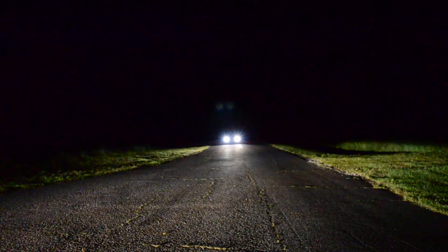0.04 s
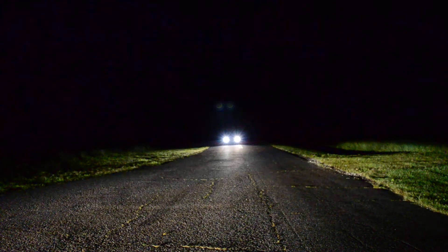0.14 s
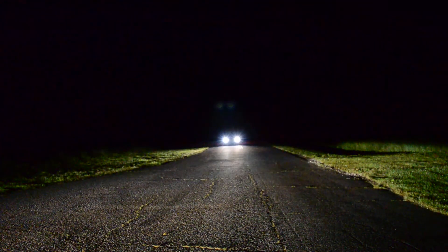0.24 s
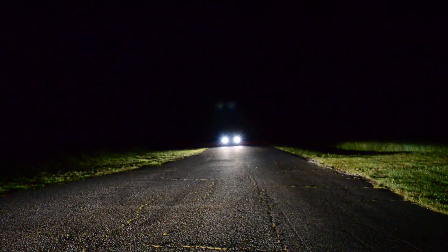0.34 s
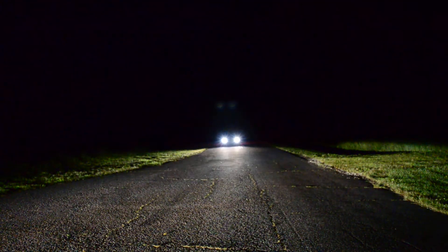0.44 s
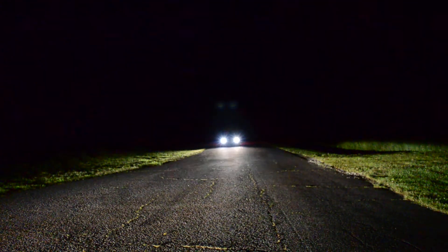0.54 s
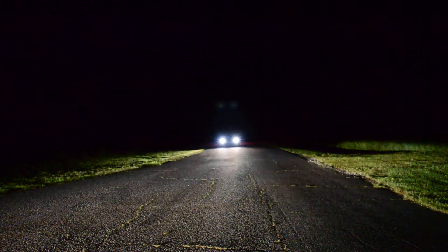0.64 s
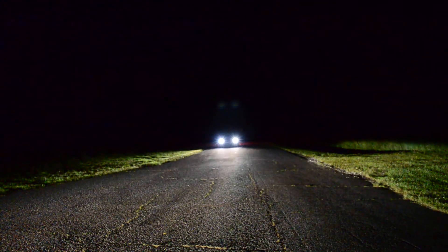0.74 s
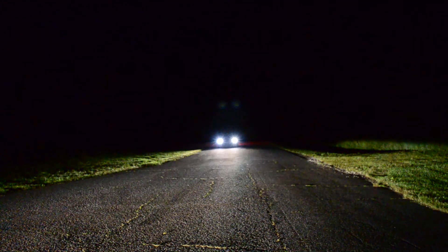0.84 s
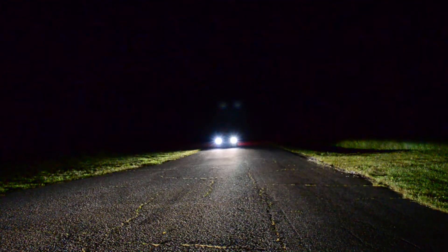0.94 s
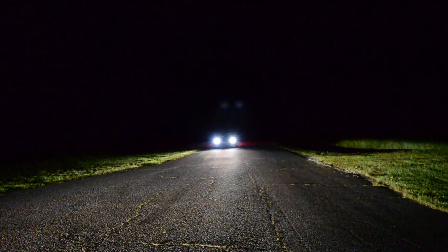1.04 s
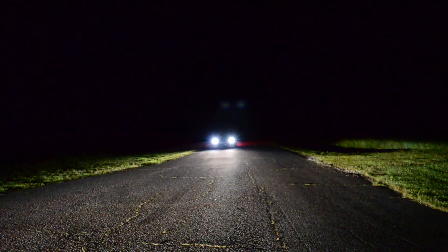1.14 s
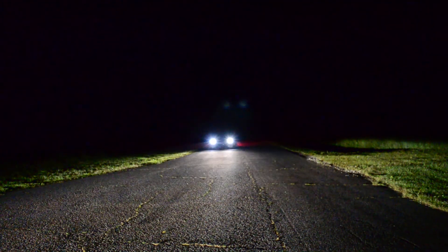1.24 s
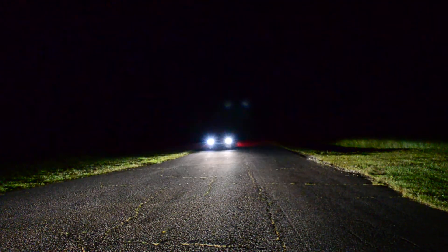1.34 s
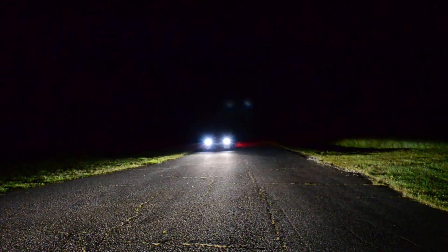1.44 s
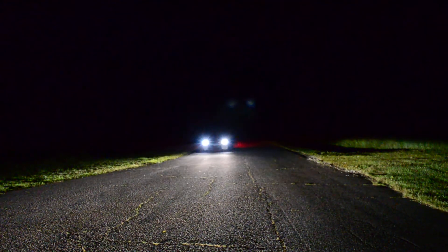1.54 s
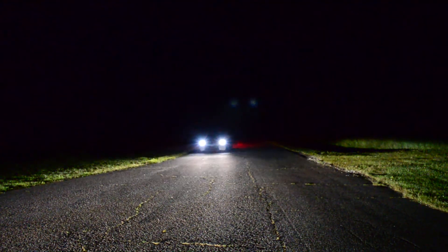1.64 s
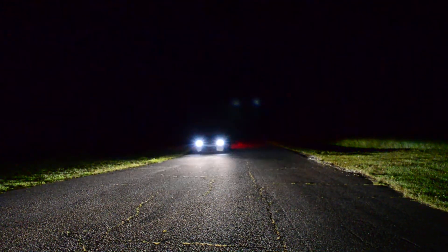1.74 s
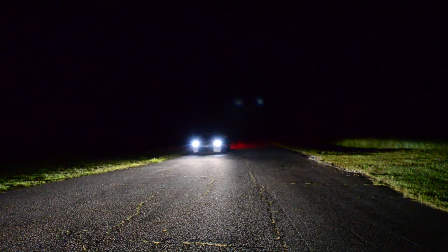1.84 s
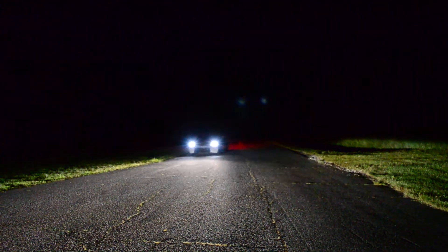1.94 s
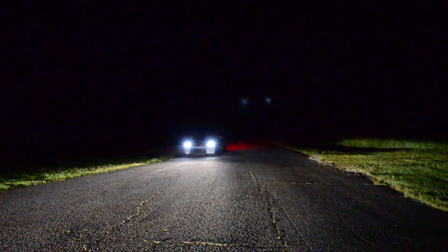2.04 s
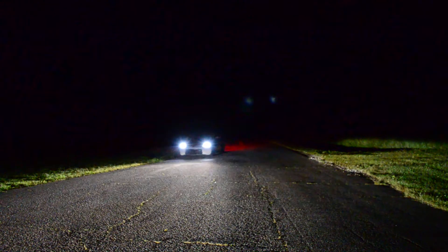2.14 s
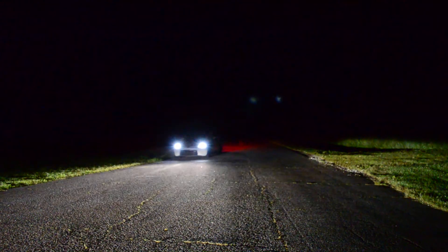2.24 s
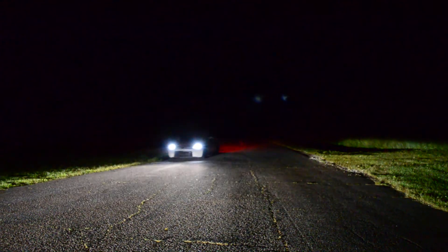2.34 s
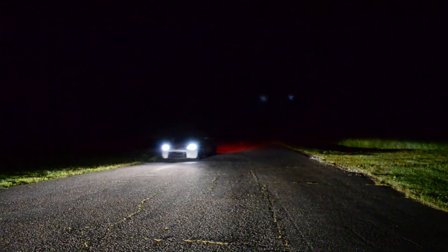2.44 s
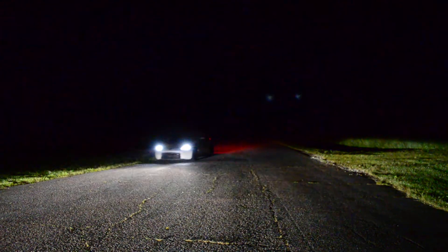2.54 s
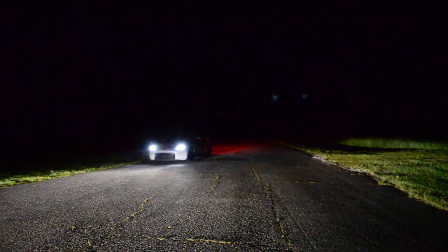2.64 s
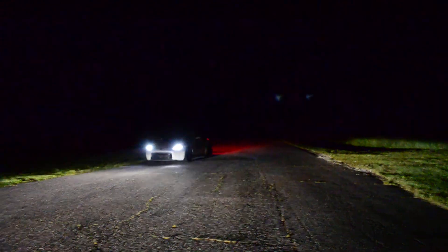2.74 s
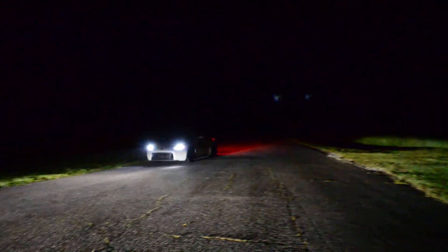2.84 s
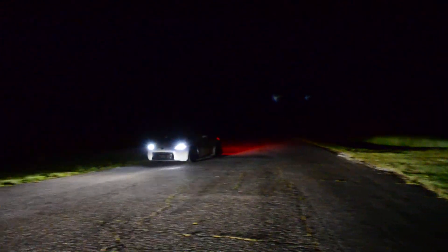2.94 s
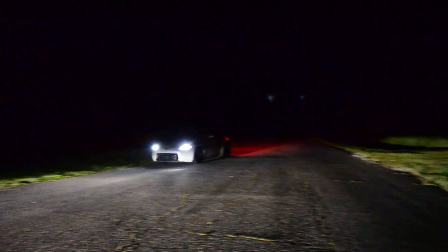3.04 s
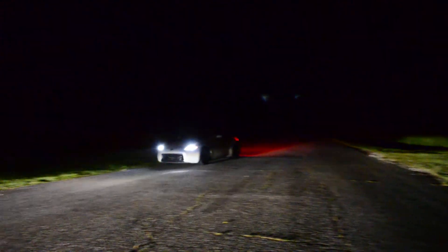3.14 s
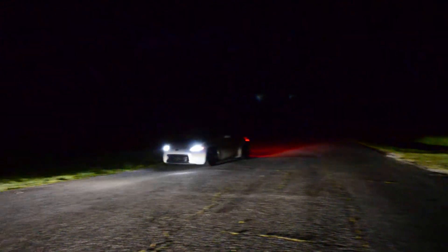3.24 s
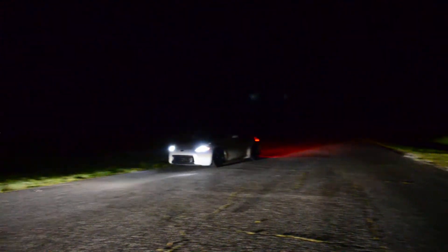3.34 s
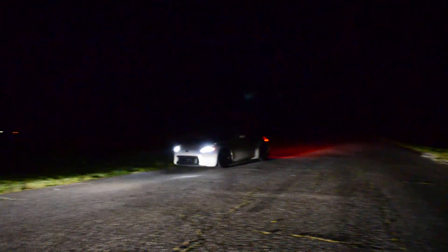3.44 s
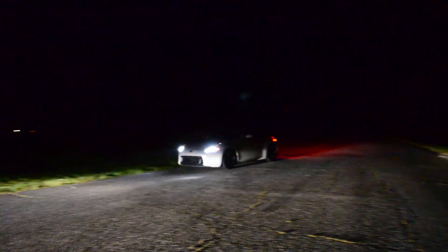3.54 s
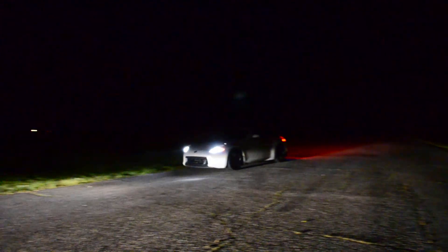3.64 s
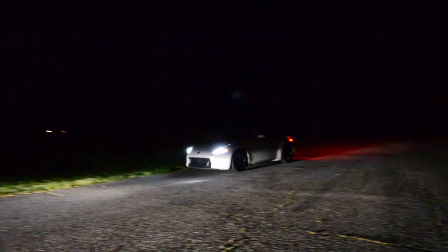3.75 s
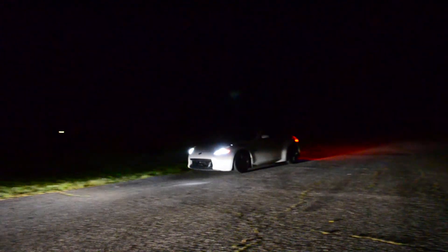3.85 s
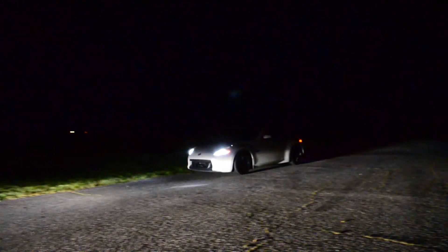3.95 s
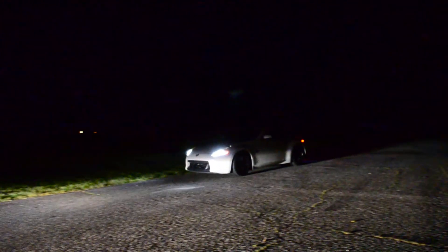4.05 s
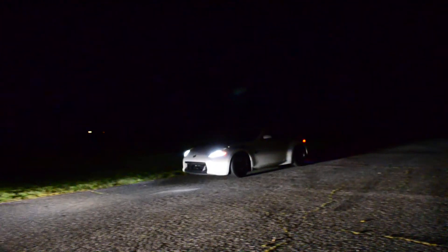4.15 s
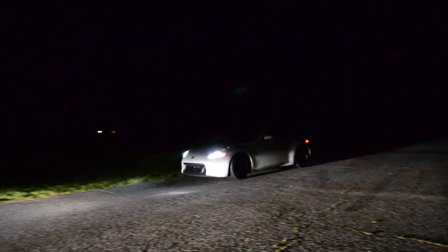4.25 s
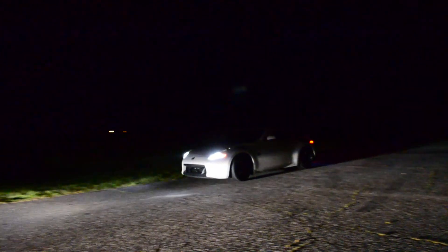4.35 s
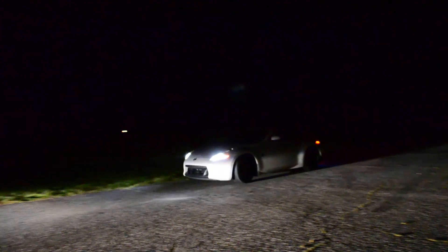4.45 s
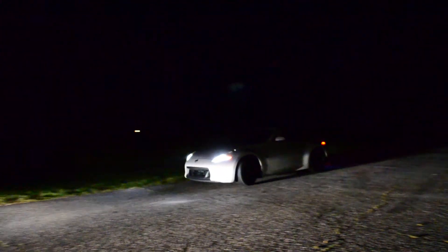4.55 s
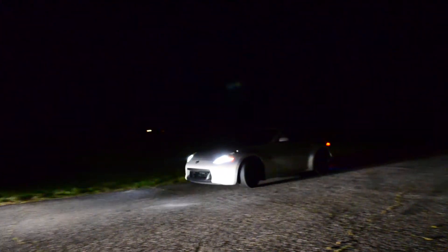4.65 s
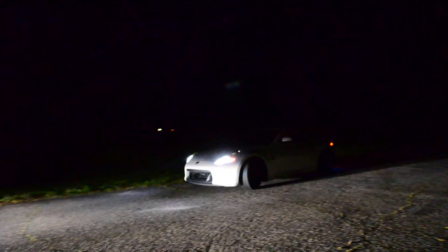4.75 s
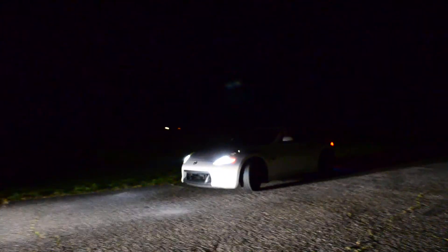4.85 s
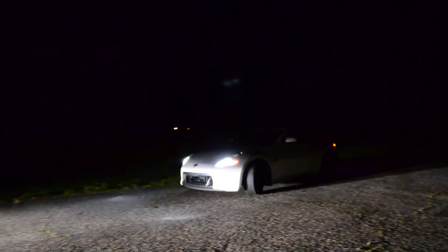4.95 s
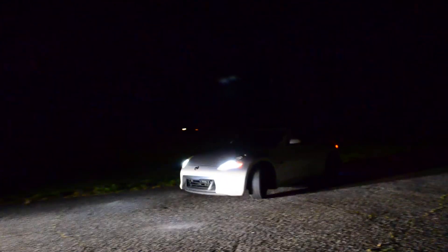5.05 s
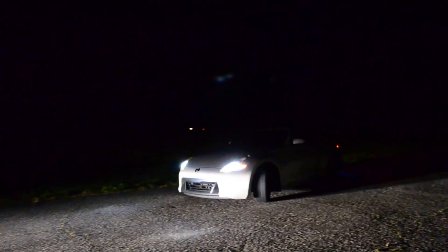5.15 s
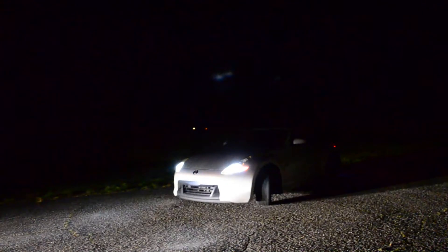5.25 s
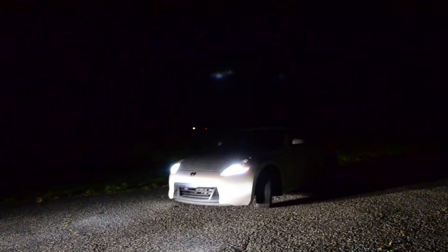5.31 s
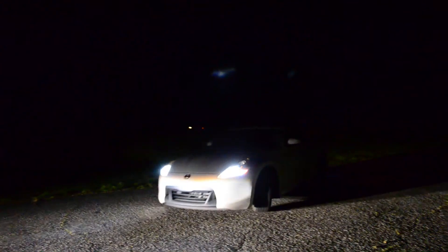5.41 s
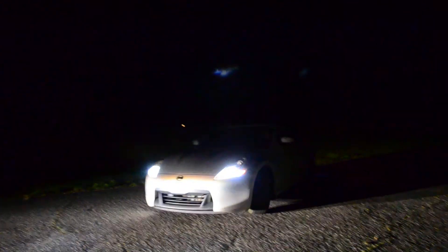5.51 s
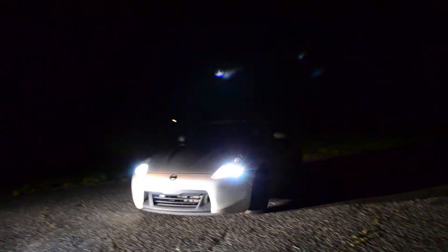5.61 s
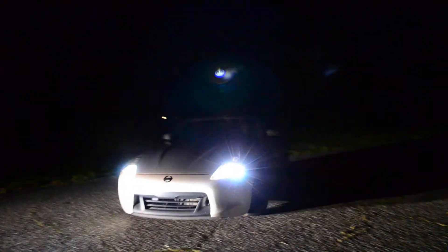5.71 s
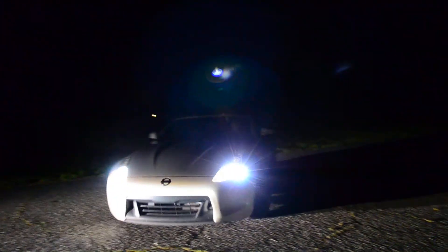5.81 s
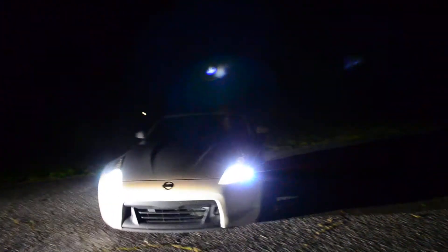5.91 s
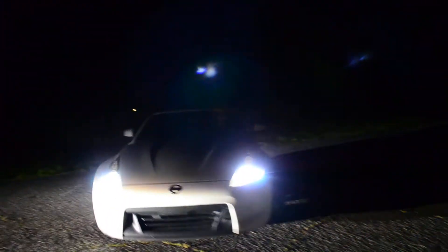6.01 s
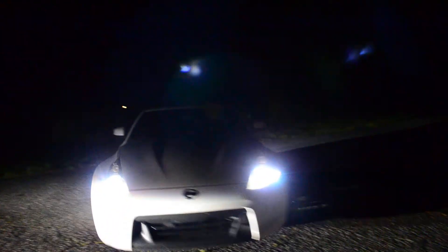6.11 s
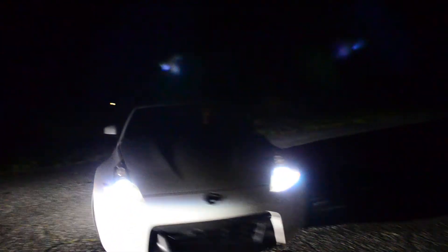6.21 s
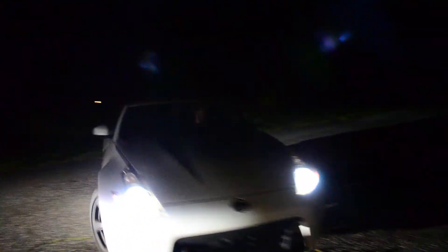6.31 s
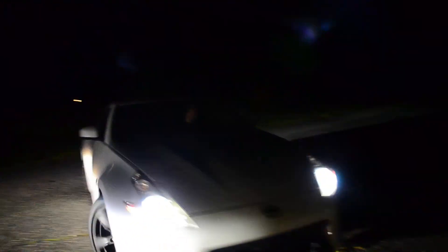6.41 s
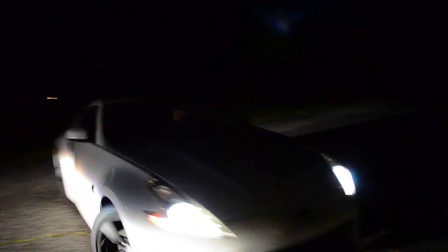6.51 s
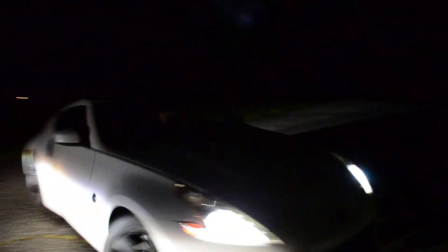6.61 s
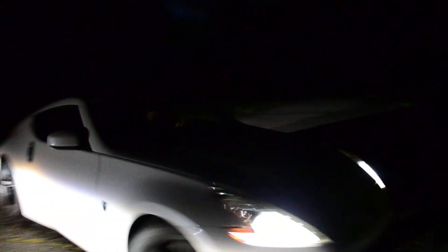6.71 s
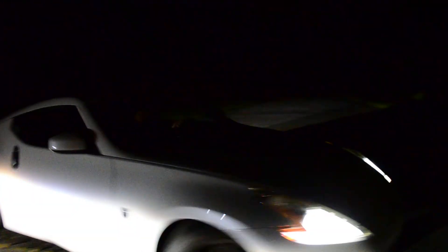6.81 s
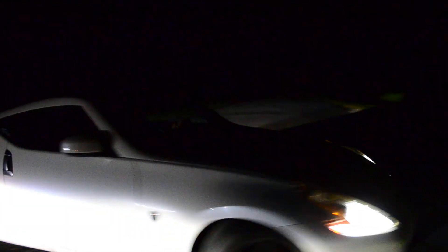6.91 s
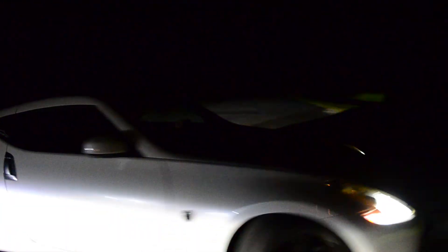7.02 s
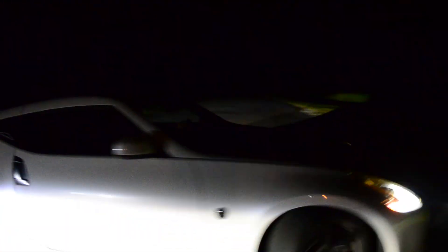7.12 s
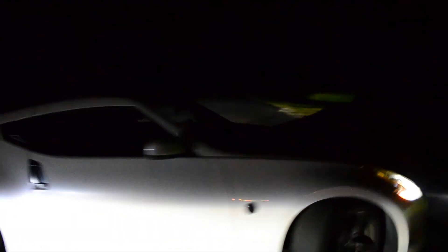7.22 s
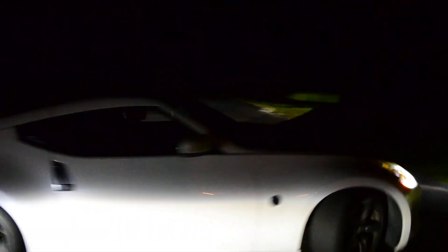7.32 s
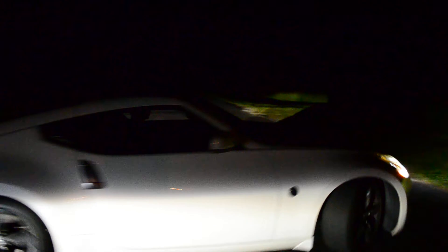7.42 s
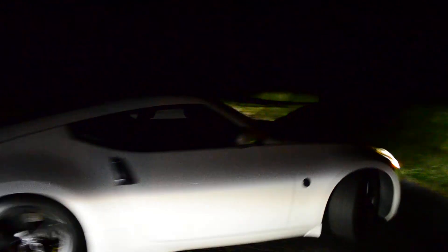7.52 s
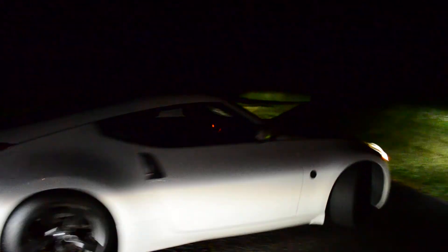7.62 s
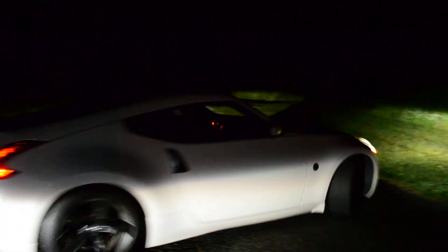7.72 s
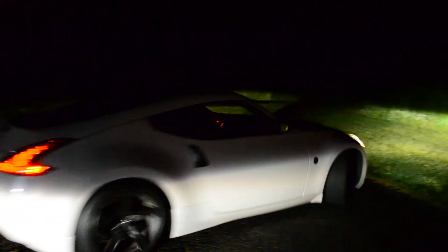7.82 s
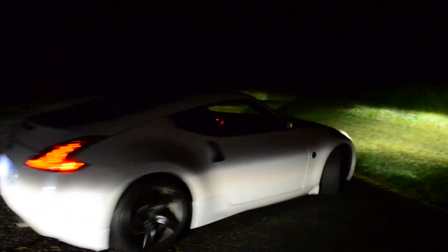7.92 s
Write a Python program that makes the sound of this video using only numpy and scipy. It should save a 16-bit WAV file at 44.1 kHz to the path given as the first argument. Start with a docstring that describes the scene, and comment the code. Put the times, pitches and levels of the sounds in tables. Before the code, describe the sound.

A sports car creeps closer past crickets and frogs, blipping its throttle, then passes close with a booming exhaust and grit snapping under its tyres.

```python
"""Night, country road. Crickets and tree frogs trill; a V6 sports car creeps up, blipping its throttle.
Its pipes boom on the firing rate and its octave, uneven firings burble, pulse fronts growl,
the engine bay clatters. By 4 s the car is nearer and the wildlife has stopped.
The car turns, with knocks from underneath, and from about 6 s passes close:
the pipes rasp, the tyres hiss, grit snaps under the tread."""
import sys
import numpy as np
from scipy import signal
from scipy.fft import rfft, irfft, next_fast_len
from scipy.io import wavfile
from scipy.ndimage import uniform_filter1d, minimum_filter1d

SR = 44100
rng = np.random.default_rng(int(sys.argv[2]) if len(sys.argv) > 2 else 0)


def put_to_file(sound):
    """Save the sound as 16-bit audio at rate SR, in the file named by the first command-line argument."""
    columns = np.atleast_2d(sound).T  # one column per channel
    safe = np.clip(columns, -1, 1)
    whole_steps = np.round(safe * 32767)
    wavfile.write(sys.argv[1], SR, whole_steps.astype(np.int16))


N = 351477
T = np.arange(N) / SR

# night air spectrum [f/Hz, level/dB]
AIR_SPECTRUM = [(15, -13.5), (30, -7), (60, 8.5), (150, 3), (500, -9.5), (2000, -25), (6000, -51.5),
                (15000, -51.5)]
# first cricket's trill [t/s, level/dB]
CRICKET_LEVEL = [(0, -65.5), (1.5, -66.5), (2.65, -68.5), (3.0, -89)]
# second cricket's chirps [t/s, level/dB]
CRICKET_CHIRPS = [(.45, -68), (1.01, -66), (1.6, -58), (2.15, -61)]
# tree frog trills [start/s, end/s, f/Hz, pulse rate/Hz, level/dB]
FROG_TRILLS = [(0, .31, 2470, 31, -56.5), (2.556, 3.3, 2261, 36, -51), (3.36, 3.737, 2540, 32, -56.5)]

# tread hiss spectrum [f/Hz, level/dB]
HISS_SPECTRUM = [(3000, -5), (5000, 2.5), (7000, -1.5), (8500, -6), (10000, -5.5), (12500, -6.5),
                 (14000, -13.5), (16000, -27)]
# loudest stone snaps [t/s, peak/dB, f/Hz]
STONE_SNAPS = [(1.372, -29, 3000), (4.401, -33, 3300), (5.913, -23, 3000), (6.405, -34, 8000),
               (6.455, -21, 3000), (6.505, -31, 5000), (6.55, -28, 4200), (6.642, -26, 3500),
               (6.737, -28, 4000), (6.764, -34, 10000), (6.884, -23, 3200), (7.151, -19, 2400),
               (7.154, -29, 8000), (7.289, -26, 2800), (7.333, -36, 9000), (7.491, -30, 5000),
               (7.857, -36, 7000)]
# underbody knocks [t/s, peak/dB]
KNOCK_HITS = [(.888, -24), (4.697, -20), (5.185, -18.5), (5.216, -23), (5.236, -18.5), (5.61, -21),
              (5.816, -19), (6.641, -16), (6.685, -13), (6.737, -13), (6.751, -12), (6.772, -15),
              (6.798, -12), (7.742, -17)]
# underbody and panel resonances [f/Hz, width/Hz, gain/dB]
UNDERBODY_MODES = [(720, 200, -8), (1150, 300, 1), (1650, 500, -8), (3000, 1200, -25)]
PANEL_MODES = [(670, 4.9, -6), (929, 18, -6.5), (1294, 150, -19.5), (1863, 140, -8.5), (2900, 150, -12)]

# engine bay clatter spectrum by side heard [f/Hz, gain/dB]
CLATTER_HEAD_ON = [(60, -24), (200, -11), (370, -11.5), (470, -4.5), (690, -1), (880, -10), (1000, -0.5),
                   (1200, 0.5), (1390, -11.5), (1680, -8.5), (2050, -22.5), (2800, -37.5), (5000, -65.5)]
CLATTER_TURNING = [(60, -23), (200, 2.5), (380, -21.5), (520, -4), (670, 0.5), (810, -8), (1000, -4.5),
                   (1250, -1), (1480, -8.5), (1850, -9), (2150, -23.5), (2800, -29), (5000, -57.5)]
CLATTER_ALONGSIDE = [(60, -42), (200, 3), (450, -3.5), (600, 5.5), (760, 5), (930, 3.5), (1080, -2),
                     (1370, 5), (1650, -3), (2050, -13.5), (2700, -56.5), (5000, -50)]
# belt and intake rush spectrum [f/Hz, gain/dB]
RUSH_SPECTRUM = [(1400, -9), (2200, 5), (2650, -0.5), (3050, -0.5), (3700, -6), (4400, -11), (5200, -19),
                 (7000, -41), (12000, -49.5)]
# engine bay envelopes [t/s, level/dB]
CLATTER_LEVEL = [(0, -32.5), (.9, -31.5), (2, -36), (3.2, -35.5), (3.85, -39.5), (4.6, -38), (5.5, -33),
                 (6.15, -32), (6.55, -27.5), (6.78, -24), (7, -27), (7.97, -31.5)]
BELT_INTAKE_LEVEL = [(0, -55.5), (2.6, -53.5), (3.38, -49.5), (3.85, -54), (4.6, -51), (5.55, -52),
                     (5.9, -49.5), (6.25, -49), (6.45, -41), (7.25, -41), (7.97, -45.5)]

# engine firing rate [t/s, f/Hz]
FIRING_RATE = [(0, 66.93), (1.45, 65.8), (1.62, 55.8), (1.88, 104), (2.02, 112), (2.15, 102.8),
               (2.78, 88.22), (3, 76.24), (3.25, 71.32), (3.72, 84.1), (4.1, 76), (4.4, 75.5), (5, 66.04),
               (5.33, 53.46), (5.55, 52.93), (5.75, 60.08), (5.95, 60.57), (6.3, 68.1), (6.65, 59.58),
               (6.9, 47.92), (7.2, 58.17), (7.6, 75.04), (7.97, 78.32)]
# six cylinders in firing order [level/dB]
CYLINDER_DB = [5, -1, 1.3, 0.2, 3, -1]
# pipe resonances: low, heard from ahead, heard towards the tailpipes [f/Hz, width/Hz, gain/dB]
PIPE_BURBLE_MODES = [(97.2, 43.6, 8), (121.1, 24.4, 6), (160.1, 20.6, 0.5), (183.3, 19.4, -4.5)]
PIPE_GROWL_MODES = [(267.4, 66.7, 3.3)]
PIPE_RASP_MODES = [(298.7, 59, 0), (352, 42, 0)]
# exhaust envelopes [t/s, level/dB]
BURBLE_LEVEL = [(0, -38), (1.5, -33.5), (2.4, -29.5), (4.3, -29), (4.9, -27.5), (5.25, -28.5), (5.8, -36),
                (6.25, -23), (6.85, -25.5), (7.1, -26), (7.5, -20), (7.97, -21)]
GROWL_LEVEL = [(0, -38.5), (1.4, -37.5), (2.2, -41.5), (2.9, -34.5), (3.2, -43), (4.3, -43), (5, -50),
               (5.3, -42), (5.8, -38), (6.3, -30), (6.8, -41), (7.55, -22), (7.97, -33.5)]
# gas flow harmonics; 1.5 comes from the two unequal banks [f/firing rate]
FLOW_MULTIPLES = [1, 1.5, 2, 3]
# strength of each harmonic [level/dB]
FLOW_DB = [-0.5, -19, 1.5, -8]
# pipe response, booming at about 70-135 Hz [f/Hz, gain/dB]
PIPE_RESPONSE = [(50, -20.5), (60, -27.5), (67, -8.5), (72, -2), (78, -0.5), (102, 3), (114, 2),
                 (123, -1.5), (135, -1.5), (150, -13.5), (195, -16.5), (230, -22)]
# throttle blips (+) and lifts (-) [centre t/s, half-length/s, boom gain/dB]
THROTTLE_MOVES = [(1.644, 0.059, 10.5), (1.73, .03, -4), (1.927, 0.19, 7), (2.765, 0.43, 9.5),
                  (3.208, 0.091, -13), (3.65, 0.15, 7), (4.816, 0.063, 3), (5.02, .06, -4),
                  (5.16, 0.063, 8.5), (5.28, .04, 3), (5.438, 0.047, -5), (5.996, .15, 11),
                  (6.871, 0.14, -5.5), (7.31, .17, 11)]
# approach and turn [t/s, boom base level/dB, bass tilt/(dB/octave), tyre hiss level/dB]
CAR_APPROACH = [(0, -47, 3, -76), (1.6, -43, 0.5, -74), (1.95, -34, 2.5, -69), (4.7, -28, -0.5, -66),
                (5.55, -26, 9, -64.5), (6.15, -17, -7.5, -60.5), (6.42, -18, -8, -58), (7.2, -22, 4, -56.5),
                (7.97, -21.5, 8.5, -56.5)]


def undb(db):
    """Decibels to gain."""
    return 10 ** (np.asarray(db) / 20)


def curves(table):
    """Each value column of a time table, per sample."""
    times_s, *columns = np.transpose(table)
    return [np.interp(T, times_s, column) for column in columns]


def unit(x):
    """Scale to rms 1."""
    return x / np.sqrt(np.mean(x ** 2))


def steady(x):
    """Hold the rms near 1 over about 1/3 s."""
    size = SR // 4
    return x / np.sqrt(uniform_filter1d(uniform_filter1d(x ** 2, size), size) + 1e-18)


def response_db(f_hz, outline):
    """Read an [f/Hz, gain/dB] outline on a log frequency axis."""
    hz, db = np.transpose(outline)
    return np.interp(np.log(f_hz), np.log(hz), db)


def colour(x, outline):
    """Filter by an outline; rms 1."""
    size = next_fast_len(N)
    f_hz = np.maximum(np.arange(size // 2 + 1) * SR / size, 1)
    return unit(irfft(rfft(x, size) * undb(response_db(f_hz, outline)), size)[:N])


def band(x, hz, width_hz, order=1):
    """One resonance, applied order times."""
    b, a = signal.iirpeak(min(hz, SR / 2.3), hz / width_hz, fs=SR)
    for _ in range(order):
        x = signal.lfilter(b, a, x)
    return x


def ring(x, modes, order=1):
    """Resonances in parallel."""
    return sum(undb(db) * band(x, hz, width_hz, order) for hz, width_hz, db in modes)


def walk(rate_hz):
    """Smooth random wander; rms 1."""
    size = int(SR / rate_hz)
    held = np.repeat(rng.standard_normal(N // size + 1), size)
    return unit(uniform_filter1d(uniform_filter1d(held, size), size)[:N])


def fade(x, decay_s):
    """Exponential tail on each impulse."""
    return signal.lfilter([1], [1, -np.exp(-1 / (decay_s * SR))], x)


def impulses(at, sizes):
    """Impulses at the given samples."""
    return np.bincount(np.clip(at, 0, N - 1).astype(int), sizes, N)


def add(out, start_s, peak_db, sound):
    """Mix in a short sound."""
    start = int(start_s * SR)
    out[start:start + len(sound)] += (undb(peak_db) * sound / abs(sound).max())[:N - start]


def night_air():
    """Steady low noise."""
    return undb(-47.5) * colour(rng.standard_normal(N), AIR_SPECTRUM)


def trill(rate_hz, pitch_hz, glide, duty, rasp):
    """Train of short tones; glide and rasp are fractions of the pitch; rms 1."""
    cycles = np.cumsum(rate_hz * (1 + .012 * walk(12))) / SR
    stroke = np.minimum(cycles % 1 / duty, 1)
    hz = pitch_hz * (1 + glide * (stroke - .5) + rasp * walk(980))
    return unit(np.sin(np.pi * stroke) * np.sin(2 * np.pi * np.cumsum(hz) / SR))


def crickets():
    """One cricket's wing strokes sag in pitch; another chirps softly."""
    strokes = trill(rate_hz=43.9, pitch_hz=4380, glide=-.11, duty=.8, rasp=.018)
    out = undb(curves(CRICKET_LEVEL)[0]) * strokes
    whistle = unit(band(rng.standard_normal(N), hz=3450, width_hz=70, order=2))
    for centre_s, db in CRICKET_CHIRPS:
        out += undb(db) * np.exp(-((T - centre_s) / .018) ** 2) * whistle
    return out


def tree_frogs():
    """Short trills; each pulse rises in pitch."""
    out = np.zeros(N)
    for start_s, end_s, pitch_hz, rate_hz, db in FROG_TRILLS:
        swell = np.interp(T, [start_s, start_s + .041, end_s - .02, end_s], [0, 1, 1, 0])
        out += undb(db) * swell * trill(rate_hz, pitch_hz, glide=.16, duty=.42, rasp=.005)
    return out


def tyre_hiss(nearness):
    """Tread hiss with fine crackling grit."""
    grains = rng.random(N) < 330 / SR
    grain_db = 3.1 * np.minimum(rng.exponential(size=N), 4)
    crackle = unit(fade(grains * undb(grain_db), decay_s=.00042) * rng.standard_normal(N))
    _, _, hiss_db = curves(CAR_APPROACH)
    return undb(hiss_db) * colour(rng.standard_normal(N) + nearness * crackle, HISS_SPECTRUM)


def pebbles(from_s=6.37, rate_hz=16, peak_db=-36, spread_db=3, ring_hz=4200):
    """Random small stones once the tyres are close [t/s, peak/dB, f/Hz]."""
    span_s = T[-1] - from_s
    return [(from_s + when * span_s, peak_db + spread_db * (2 * size - 1), ring_hz * 2 ** (pitch - .5))
            for when, size, pitch in rng.random((int(rate_hz * span_s), 3))]


def stones(nearness):
    """Stones crack, crumbs skitter, the tread pops; the sharp edge carries best close by."""
    out, t = np.zeros(N), T[:SR // 10]
    for start_s, peak_db, hz in STONE_SNAPS + pebbles():
        crumbs = (rng.random(len(t)) < 900 / SR) * np.exp(-t / .008)
        crack = np.exp(-t / .0026) + .25 * np.exp(-t / .012)
        snap = (crack + .7 * crumbs) * rng.standard_normal(len(t))
        body = band(snap, hz, width_hz=.8 * hz, order=2)
        edge = np.interp(start_s, T, nearness) * band(snap, hz=7400, width_hz=6600, order=2)
        pop = band(snap, hz=2100, width_hz=1900, order=3)
        add(out, start_s, peak_db, body + .18 * edge + 1.5 * pop)
    return out


def knocks():
    """Metal under the car: hard contact and brief chatter, muffled by the body."""
    out, t = np.zeros(N), T[:SR // 20]
    muffle = signal.butter(4, 3000, fs=SR, output="sos")
    contact = 12 * (t == 0)
    for start_s, peak_db in KNOCK_HITS:
        chatter = np.exp(-t / .0035) * rng.standard_normal(len(t))
        metal = ring(contact + chatter, UNDERBODY_MODES, order=2)
        add(out, start_s, peak_db, signal.sosfilt(muffle, metal))
    return out


def firing_samples(phase):
    """One firing per whole turn of phase."""
    return np.flatnonzero(np.diff(np.floor(phase)))


def firings(phase, scatter_db, jitter_s):
    """Sample and strength of each firing: cylinder pattern plus chance."""
    at = firing_samples(phase)
    level_noise, time_noise = rng.standard_normal((len(at), 2)).T
    sizes = undb(np.resize(CYLINDER_DB, len(at)) + scatter_db * level_noise)
    return at + jitter_s * SR * time_noise, sizes


def engine_bay(phase):
    """Valve gear rattles the panels per firing, partly repeating per cycle; belts and intake rush."""
    hits = impulses(*firings(phase, scatter_db=7, jitter_s=.0026))
    beat = unit(fade(hits, decay_s=.0068))
    cycle_noise = rng.standard_normal(4096)
    cycle_position = phase / len(CYLINDER_DB) % 1
    repeating = cycle_noise[(cycle_position * len(cycle_noise)).astype(int)]
    rattle = unit((rng.standard_normal(N) + .37 * repeating) * (1 + .24 * beat))
    rattle += ring(rattle, PANEL_MODES)
    sides = (CLATTER_HEAD_ON, CLATTER_TURNING, CLATTER_ALONGSIDE)
    facing = np.interp(T, [2.4, 3.8, 5.6, 6.6], [0, 1.32, .48, 2])  # crossfade index into sides
    clatter = sum(np.maximum(1 - abs(facing - k), 0) * colour(rattle, side)
                  for k, side in enumerate(sides))
    clatter_db = curves(CLATTER_LEVEL)[0] + .63 * walk(17)
    rush = undb(curves(BELT_INTAKE_LEVEL)[0]) * colour(rattle, RUSH_SPECTRUM)
    return undb(clatter_db) * clatter + rush


def tailpipe_jet():
    """Turbulent rumble, rising as the car nears."""
    level_db = np.interp(T, [1.5, 2.2, 5, 7.5], [-66, -58.5, -54.5, -53])
    return undb(level_db) * unit(band(rng.standard_normal(N), hz=40, width_hz=50, order=2))


def exhaust_growl(phase):
    """Sharp pulse fronts ring the pipes: hollow head-on, rasping side-on."""
    pulses = steady(impulses(*firings(phase, scatter_db=1, jitter_s=.0001)))
    clarity = np.interp(T, [1.5, 2.6, 6], [.04, .65, .95])  # pulses arrive scattered from afar
    puffs = np.sqrt(clarity) * pulses + np.sqrt(1 - clarity) * rng.standard_normal(N)
    hollow_db = np.interp(T, [2.9, 3.5], [3, -16])
    rasp_db = np.interp(T, [2.9, 4.2, 5, 5.6, 6.5, 7.3], [-7.5, -21, -21.5, -3, -4, 1.5])
    hollow = undb(hollow_db) * band(puffs, hz=232, width_hz=47, order=3)
    rasp = undb(rasp_db) * ring(puffs, PIPE_RASP_MODES, order=3)
    growl = ring(puffs, PIPE_GROWL_MODES, order=3)
    return undb(curves(GROWL_LEVEL)[0]) * steady(growl + hollow + rasp)


def exhaust_burble(phase):
    """The unevenness of the firings rings the low pipe modes."""
    at, sizes = firings(phase, scatter_db=1.8, jitter_s=.0005)
    even = impulses(firing_samples(phase), np.full(len(at), sizes.mean()))
    uneven = impulses(at, sizes) - 1.064 * even
    level_db = curves(BURBLE_LEVEL)[0] + .8 * walk(8.7)
    return undb(level_db) * steady(ring(uneven, PIPE_BURBLE_MODES, order=2))


def throttle_db():
    """Each blip or lift is a smooth bump or dip in the boom."""
    return sum(db * np.exp(-((T - centre_s) / half_s) ** 2) for centre_s, half_s, db in THROTTLE_MOVES)


def exhaust_boom(phase, firing_hz):
    """Mean gas flow harmonics swell in turn as the revs carry them through the pipe resonance."""
    base_db, tilt_db_per_octave, _ = curves(CAR_APPROACH)
    drive_db = base_db + throttle_db()
    out = np.zeros(N)
    for multiple, harmonic_db in zip(FLOW_MULTIPLES, FLOW_DB):
        pipe_db = response_db(multiple * firing_hz, PIPE_RESPONSE)
        tilt_db = tilt_db_per_octave * np.log2(2 / multiple)
        level_db = drive_db + harmonic_db + pipe_db + tilt_db + .42 * walk(18)
        out += undb(level_db) * np.sin(2 * np.pi * multiple * phase)
    return np.sqrt(2) * out


def scene():
    """Quiet night plus car; mono."""
    firing_hz = curves(FIRING_RATE)[0]
    phase = np.cumsum(firing_hz) / SR  # counts firings
    nearness = np.interp(T, [6.2, 6.4], [.2, .7])
    night = night_air() + crickets() + tree_frogs()
    chassis = tyre_hiss(nearness) + stones(nearness) + knocks() + engine_bay(phase)
    exhaust = tailpipe_jet() + exhaust_growl(phase) + exhaust_burble(phase)
    exhaust += exhaust_boom(phase, firing_hz)
    return (night + chassis + exhaust)[None]


def record(dry):
    """Limiter on the loudest booms, faint electronic whine, top cut."""
    ceiling, limiter_s, whine_hz, top_hz = .57, .015, 15669, 15800
    size = int(limiter_s * SR)
    needed_gain = ceiling / np.maximum(abs(dry), ceiling)
    gain = uniform_filter1d(minimum_filter1d(needed_gain, 2 * size), size)
    whine = undb(-80.5) * np.sin(2 * np.pi * whine_hz * T)
    lowpass = signal.ellip(8, .2, 70, top_hz, fs=SR, output="sos")
    return signal.sosfilt(lowpass, gain * dry + whine)


dry = scene()
out = record(dry)
put_to_file(out)
```